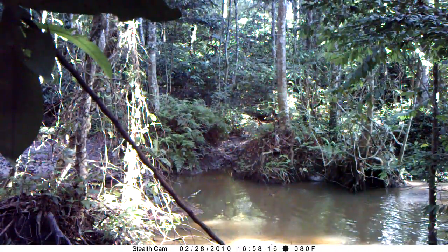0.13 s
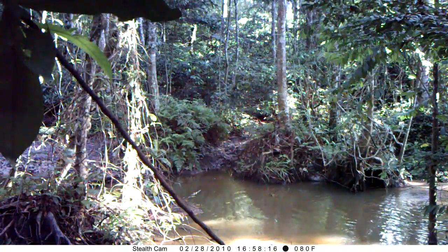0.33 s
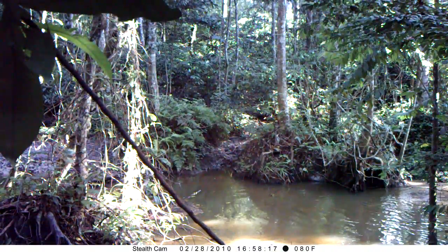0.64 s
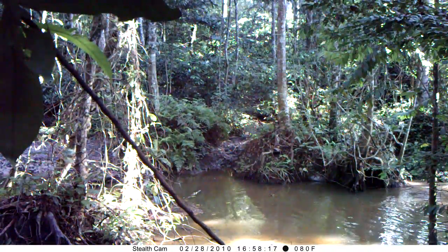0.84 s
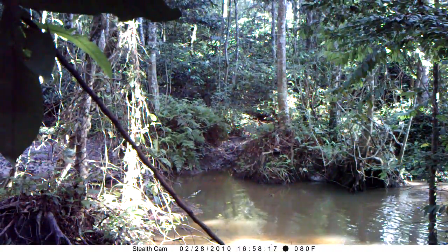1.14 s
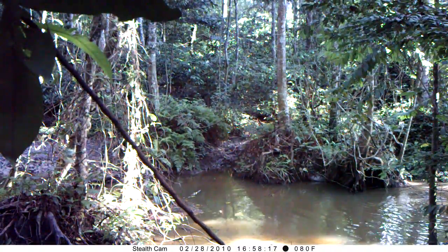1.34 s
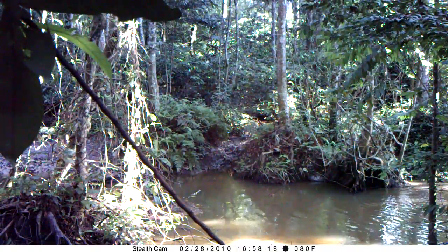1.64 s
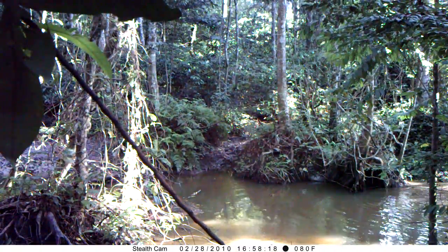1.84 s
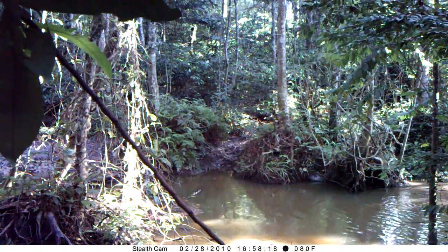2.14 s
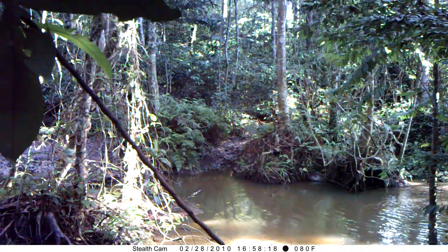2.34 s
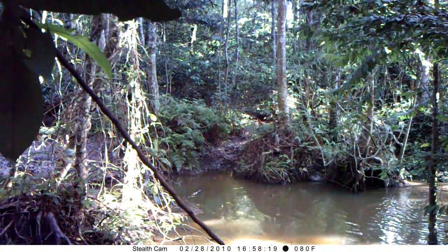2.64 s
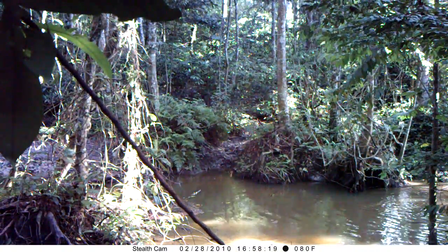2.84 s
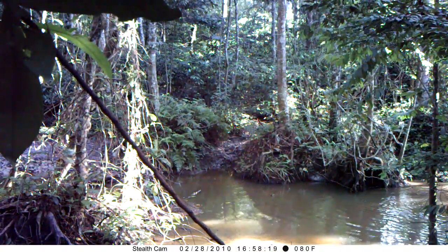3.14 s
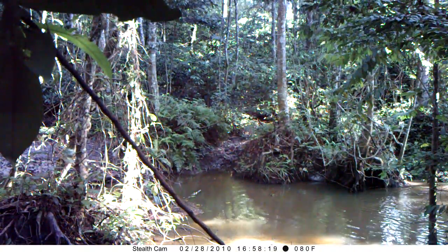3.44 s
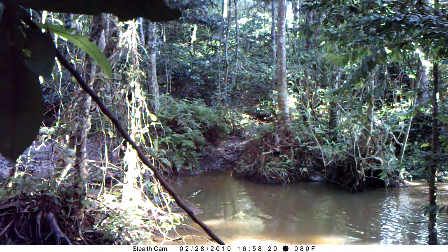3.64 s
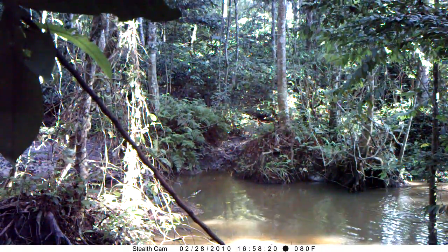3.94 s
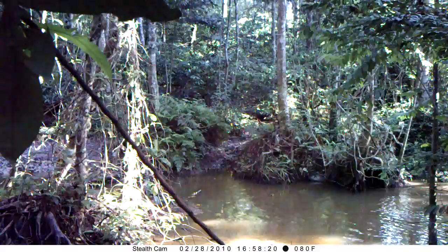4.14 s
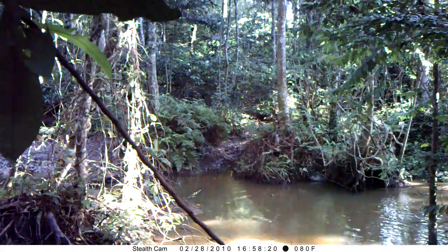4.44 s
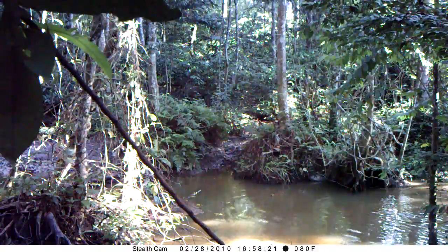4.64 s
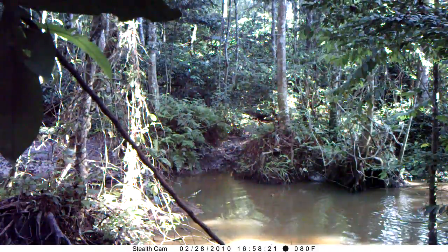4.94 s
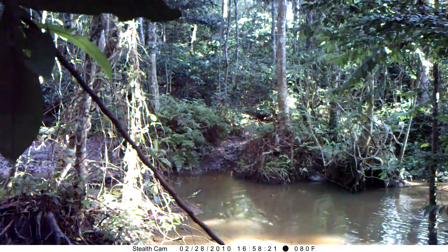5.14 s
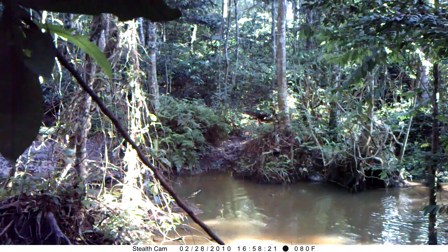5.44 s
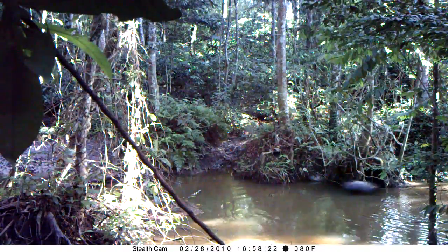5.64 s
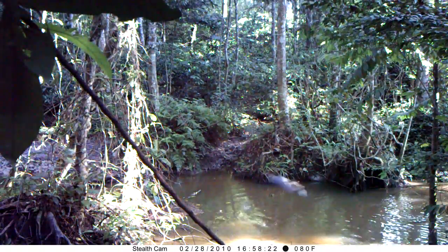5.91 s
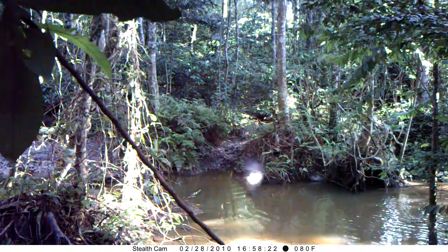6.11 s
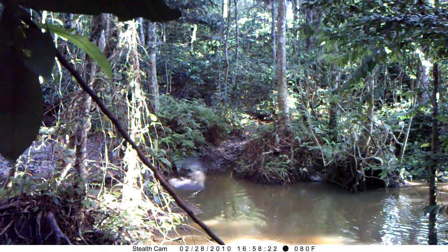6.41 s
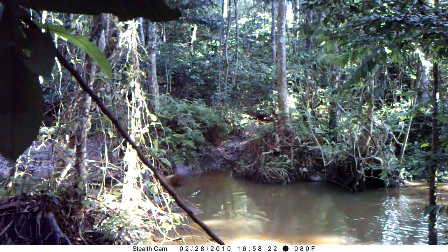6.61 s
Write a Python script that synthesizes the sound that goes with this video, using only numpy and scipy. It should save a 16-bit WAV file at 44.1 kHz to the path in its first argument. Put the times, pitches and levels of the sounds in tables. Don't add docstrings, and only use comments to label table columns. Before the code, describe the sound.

Harsh, throaty bird cries dominate: six separate nasal honks, rasping and breathy, wavering in pitch before dropping off, and growing stronger toward the final one. Each leaves a woodland echo of about a second. Before them come dry twig clicks and a slight rustle; beneath lies low steady hiss with sparse pulsing crickets and very faint insect whistles. The cheap mono microphone is band-limited, slightly gritty, and clips on the last cry.

```python
import sys
import numpy as np
from scipy import signal
from scipy.io import wavfile
from scipy.ndimage import uniform_filter1d, minimum_filter1d

SR = 44100
rng = np.random.default_rng(int(sys.argv[2]) if len(sys.argv) > 2 else 0)


def field_ratio(decibels):
    return 10 ** (np.asarray(decibels, dtype=float) / 20)


def materialize(psi):
    bounded = np.clip(np.atleast_2d(psi).T, -1, 1)
    quanta = np.round(bounded * 32767).astype(np.int16)
    wavfile.write(sys.argv[1], SR, quanta)


N = 298557


def evened(x):
    return x / np.sqrt(np.mean(x ** 2) + 1e-20)


def read(points, hz):
    f, value = np.transpose(points)
    return np.interp(np.log(hz + 1), np.log(f + 1), value)


def unroll(t, rows):
    return np.interp(t, *np.transpose(rows))


def wander(shape, seconds):
    size = max(int(seconds * SR), 1)
    return evened(uniform_filter1d(uniform_filter1d(rng.standard_normal(shape), size), size))


def add(mix, s, sound):
    part = mix[round(s * SR):][:len(sound)]
    part += sound[:len(part)]


# f/Hz, density/dB
HISS_SPECTRUM = [(15, -45), (25, -17.5), (665, -7), (979, -11), (1520, -7), (1730, -20), (2130, -7.5),
                 (2550, -13.5), (2900, -4), (3380, -10), (5530, -10), (6460, -13.5), (12000, -9),
                 (15600, -42), (22000, -120)]


def hiss():
    level_db, lift_db, rustle_db, rustle_end_s, rustle_fade_s = -56, 8, 5.5, .4, 1
    frames, hz = N // 256 + 5, np.fft.rfftfreq(1024, 1 / SR)[:, None]
    real, imag, patches = rng.standard_normal((frames, 513, 3)).T
    patches = evened(uniform_filter1d(uniform_filter1d(patches, 10, 0), 12, 1))
    colour = field_ratio(read(HISS_SPECTRUM, hz))
    t = np.arange(frames) * 256 / SR
    swell_db = lift_db + rustle_db * np.clip(1 - (t - rustle_end_s) / rustle_fade_s, 0, 1)
    swell_db = swell_db * np.minimum(hz / 1500, 1)
    z = (real + 1j * imag) * colour / np.linalg.norm(colour) * field_ratio(1.9 * patches + swell_db)
    return field_ratio(level_db) * signal.istft(z, nperseg=1024, noverlap=768)[1][:N]


# f/Hz, t60/s
FOREST_T60 = [(400, 0.12), (1400, 0.89), (2500, 0.86), (4500, 0.7), (7000, 0.65), (11000, 0.93)]
# f/Hz, level/dB
ECHO_COLOUR = [(500, -11), (1500, -8.5), (3000, -7), (5000, -3), (9000, -4)]


def forest_echo(x):
    t, out, length = np.arange(N) / SR, np.zeros(N), 3 * SR // 2
    for path in range(3):
        taps = np.zeros(length)
        at = np.arange(300, length - 20, 20)
        taps[at + rng.integers(0, 20, len(at))] = rng.choice([-1., 1.], len(at))
        hz, s, z = signal.stft(taps, SR, nperseg=256)
        near = field_ratio(-60 * s / read(FOREST_T60, hz)[:, None])
        far = field_ratio(-24.0 - 60 * s / 2.28)
        decay = (near + far) * np.minimum(s / 0.053 + 0.19, 1)
        decay /= np.sqrt((decay ** 2).mean(1, keepdims=True) * len(at))
        z = z * decay * field_ratio(read(ECHO_COLOUR, hz)[:, None])
        tail = signal.istft(z, SR, nperseg=256)[1]
        share = np.sqrt(2 / 3) * np.cos(np.pi * (5 * t + path / 3))
        out += share * signal.oaconvolve(x, tail)[:N]
    return out


# t/s, peak/dB, f/Hz
TWIGS = [
    (0.055, -23.5, 4530),
    (0.0684, -19.5, 7200),
    (0.2124, -20.5, 7660),
]


def twigs(mix):
    t = np.arange(400) / SR
    for s, db, hz in TWIGS:
        add(mix, s, field_ratio(db - 60 * t / 0.0018) * np.sin(2 * np.pi * hz * t))


def chirp(start, db, hz, throb_hz, depth, waver):
    t = start + np.arange(len(hz)) / SR
    throb = 1 - depth * np.cos(np.pi * throb_hz * t) ** 2
    wavering_hz = hz * (1 + waver * wander(len(t), 0.0045))
    tone = np.sin(2 * np.pi * np.cumsum(wavering_hz) / SR)
    return start, field_ratio(db) * evened(tone * throb) * signal.windows.tukey(len(t), .15)


# t/s, length/s, peak/dB, f/Hz
CRICKETS = [
    (0.123, 0.2, -50.5, 2950),
    (2.26, 0.14, -49, 2945),
    (4.234, 0.084, -49, 2940),
    (5.563, 0.14, -52.5, 2950),
    (5.861, 0.15, -49, 2970),
]


def crickets(mix):
    for start, length, peak_db, hz in CRICKETS:
        u = np.linspace(0, 1, round(length * SR))
        db = peak_db - 16 * np.clip(1 - u / 0.22, 0, 1) - 9 * np.clip(u - .3, 0, 1)
        add(mix, *chirp(start, db, hz + 0 * u, throb_hz=68.0, depth=0.63, waver=0.012))


# t/s, length/s, peak/dB, first f/Hz
WHISTLES = [
    (2.28, .16, -63, 5550),
    (5.42, .13, -63, 5620),
    (5.66, .31, -60, 5350),
]


def whistles(mix):
    top_hz = 5710
    for start, length, peak_db, first_hz in WHISTLES:
        u = np.linspace(0, 1, round(length * SR))
        hz = first_hz + (top_hz - first_hz) * np.sin(np.pi / 2 * np.minimum(u / 0.41, 1)) ** 2
        db = peak_db - 14 * (u - .7) ** 2
        add(mix, *chirp(start, db, hz, throb_hz=30, depth=0.33, waver=0.003))


# t/s, depth/dB, half width/s
THINNINGS = [(.31, 6, 0.018), (.55, 6, 0.026), (.68, 11, 0.019), (1.313, 8.5, 0.023), (1.421, 9.5, 0.093),
             (2.548, 13.5, 0.022), (2.646, 8.5, 0.031), (2.759, 6, 0.036), (2.848, 6, 0.01), (3.02, 1, 0.024),
             (3.599, 8, 0.1), (3.718, 21, 0.02), (3.773, 9.5, 0.024), (4.421, 6.5, 0.039), (4.49, 11, 0.033),
             (4.729, 11.5, 0.042), (6.138, 6, 0.051), (6.3, 5.5, 0.12), (6.4, -2, 0.034),
             (4.899, -2.5, 0.078), (1.78, -1, 0.088)]


def thinning(t):
    return sum(db * np.clip(1 - abs(t - s) / width, 0, 1) for s, db, width in THINNINGS)


# start/s, end/s, half-line level/dB
DOUBLING = [(.36, .47, -14), (1.3, 1.44, -15), (1.5, 1.7, -3), (1.72, 1.88, -10), (2.6, 2.72, -12),
            (2.92, 3.03, -14), (3.55, 3.66, -14), (4.4, 4.55, -14), (4.62, 4.7, -12), (6.07, 6.14, -11),
            (6.27, 6.46, -2)]


def half_lines(t):
    half = sum(field_ratio(db) * np.clip(np.minimum(t - a, b - t) / 0.013, 0, 1) for a, b, db in DOUBLING)
    return half + field_ratio(-19.5 + 5 * wander(len(t), .03))


# f/Hz, level/dB
THROAT = [(640, -42.5), (780, -40), (1020, -6.5), (1250, -6.5), (1480, 8.5), (1780, -3), (2080, 2.5),
          (2330, -1), (2620, 1.5), (3400, -3.5), (4500, -3), (6000, -6), (8000, -15), (12000, -28.5)]


def throat_db(hz, beak, nasal_db, bright_db):
    nasal = np.clip((hz - 1850) / 400 + .5, 0, 1)
    bright = np.clip((hz - 3276) / 400 + .5, 0, 1)
    return read(THROAT, hz / np.clip(beak, 7 / 8, 9 / 8)) + nasal_db * nasal + (bright_db - nasal_db) * bright


def partials(t, hz, turns, half, strain, shape):
    k = np.arange(3, 48)[:, None] / 2
    coarse = slice(None, None, 64)
    line_hz = k * hz[coarse]
    shimmer_db = (2.5 + .12 * k) * wander((len(k), len(t[coarse])), .014 / 64)
    slip = .0035 * k ** 1.4 * strain[coarse] * wander(shimmer_db.shape, .006 / 64)
    gains = field_ratio(throat_db(line_hz, *(c[coarse] for c in shape))) * np.where(k % 1, half[coarse], 1)
    low_rms = np.sqrt((gains ** 2 * (line_hz < 1800)).sum(0) / 2)
    gains *= field_ratio(shimmer_db) / low_rms
    swings = gains * np.exp(2j * np.pi * (rng.random(k.shape) + slip))
    half_turn = np.exp(1j * np.pi * turns)
    voice, partial = np.zeros(len(t)), half_turn ** 2
    for swing in swings:
        partial = partial * half_turn
        voice += (np.interp(t, t[coarse], swing) * partial).real
    return voice


def chest_tone(hz, turns, half, level_db):
    db = level_db + 8.5 + 0.0037 * (hz - 520) + 2.5 * wander(len(hz), 0.013)
    undertone = field_ratio(-4.5) * half ** 2 * np.cos(3 * np.pi * turns)
    return field_ratio(db) * (np.cos(2 * np.pi * turns) + undertone)


def pulsed_breath(t, turns, shape):
    puffs = (0.93 + np.exp(-(turns % 1) / 0.064)) * rng.standard_normal(len(t))
    f, s, z = signal.stft(evened(puffs), SR, nperseg=256)
    f = f[:, None]
    tint = field_ratio(throat_db(f, *(np.interp(s + t[0], t, c) for c in shape)))
    tint /= np.sqrt((tint ** 2 * (f < 1800)).mean(0))
    return signal.istft(z * tint, SR, nperseg=256)[1][:len(t)]


def cry(row, pitch, effort):
    bright_db, chest_db, nasal_db, resonance_scale, hoarseness = row
    t = np.arange(pitch[0][0], pitch[-1][0], 1 / SR)
    hz = uniform_filter1d(unroll(t, pitch), size=300)
    thinning_db = thinning(t)
    muffle_db = 24.5 * np.exp(-(t - t[0]) / 0.017)
    effort_db = unroll(t, effort) - thinning_db
    bright_db = bright_db + thinning_db - muffle_db
    chest_db = chest_db + 1.1 * thinning_db
    nasal_db = nasal_db + 1.1 * thinning_db - 0.71 * muffle_db
    beak = resonance_scale + 0.52 * (hz / 520 - 1)
    shape = beak, nasal_db, bright_db
    glide_hz_per_s = abs(np.gradient(uniform_filter1d(hz, size=600))) * SR
    strain = hoarseness + np.minimum(glide_hz_per_s / 1800, 2.0)
    turns = np.cumsum(hz * (1 + .003 * strain * wander(len(t), .004))) / SR
    half = half_lines(t)
    voice = partials(t, hz, turns, half, strain, shape)
    chest = chest_tone(hz, turns, half, chest_db)
    breath = field_ratio(-20) * strain ** 1.3 * pulsed_breath(t, turns, shape)
    edge = np.clip(np.minimum((t - t[0]) / 0.0012, (t[-1] - t) / 0.049), 0, 1)
    return t[0], field_ratio(effort_db) * edge * (voice + chest + breath)


# brightness/dB, chest tone/dB, nasal band/dB, throat resonance scale/1, hoarseness/1
CRIES = [
    (7, -29, 1, 0.974, 2.2),
    (5, -33.5, -1, 1.0, 1.6),
    (6.5, -31.5, 1, 1.004, 1.6),
    (9, -31.5, 1.5, 1.012, 1.6),
    (5.5, -32, 0.5, 1.0155, 1.4),
    (5, -35.5, -3, 0.973, 1.4),
]
# t/s, f/Hz
PITCH = [
    [(.232, 349.3), (.272, 506), (.33, 544.7), (.404, 485.8), (.52, 546.3), (.6, 487.5), (.7, 513.7),
     (.726, 427.5), (.76, 367.3)],
    [(1.205, 347.4), (1.29, 532.4), (1.455, 515), (1.491, 430.5), (1.521, 491.8), (1.689, 481.4),
     (1.709, 446.3), (1.87, 427.2), (1.93, 394)],
    [(2.508, 377), (2.59, 532), (2.694, 541), (2.73, 504.2), (2.88, 530), (2.92, 429.3), (3.03, 438),
     (3.088, 473), (3.16, 383)],
    [(3.455, 331.5), (3.529, 523), (3.575, 539), (3.639, 471), (3.685, 512), (3.72, 500.7), (3.769, 537.6),
     (3.831, 492.7), (3.9, 371.4)],
    [(4.322, 374.6), (4.41, 520), (4.55, 520), (4.585, 441.3), (4.64, 496.6), (4.76, 517.8), (4.815, 418.4),
     (4.995, 406.3), (5.04, 290.5)],
    [(5.985, 319.1), (6.074, 491.7), (6.124, 515.2), (6.205, 509.2), (6.222, 450.5), (6.38, 480.7),
     (6.45, 466.8), (6.484, 391), (6.515, 268)],
]
# t/s, effort/dB
EFFORT = [
    [(.232, -38.5), (.27, -36), (.41, -32.5), (.6, -34), (.73, -31), (.76, -20)],
    [(1.205, -49.5), (1.237, -32), (1.34, -28.5), (1.48, -27), (1.655, -28), (1.7, -30.5), (1.89, -30.5),
     (1.93, -22.5)],
    [(2.508, -47), (2.53, -26), (2.7, -27.5), (2.83, -30), (3.07, -29), (3.16, -24.5)],
    [(3.455, -44), (3.48, -35.5), (3.53, -26), (3.64, -26.5), (3.75, -26), (3.87, -28), (3.9, -30)],
    [(4.322, -39.5), (4.36, -28), (4.47, -23), (4.68, -24), (4.78, -21), (4.83, -29), (5.0, -29.5),
     (5.04, -29.5)],
    [(5.985, -34.5), (6.028, -22), (6.17, -13.5), (6.29, -23), (6.37, -17.5), (6.44, -22), (6.515, -34.5)],
]


def bird(mix):
    for row, pitch, effort in zip(CRIES, PITCH, EFFORT):
        add(mix, *cry(row, pitch, effort))


def scene():
    direct = np.zeros(N)
    twigs(direct)
    crickets(direct)
    whistles(direct)
    bird(direct)
    mono = direct + forest_echo(direct) + hiss()
    return np.array([mono, mono])


# f/Hz, width/Hz, level/dB
PORT_DIPS = [(2350, 100, -6), (3694, 393, -6), (7930, 1000, -1)]
# f/Hz, level/dB
THRIFT = [(400, -80), (900, -24), (1500, -10), (2500, -4), (3400, -3.8), (5000, -8), (7500, -1.5),
          (11500, -1.5)]


def camera_bands(x, size=1024):
    edge_hz = 11900
    n, k = np.arange(2 * size)[:, None], np.arange(300 * size // 512)
    window = np.sin(np.pi * (n + .5) / (2 * size))
    basis = window * np.cos(np.pi / size * (n + .5 + size / 2) * (k + .5)) * np.sqrt(2 / size)
    padded = np.pad(x, (size, 2 * size - len(x) % size))
    c = np.lib.stride_tricks.sliding_window_view(padded, 2 * size)[::size].copy() @ basis
    hz = (k + .5) * SR / 2 / size
    port_db = sum(db * np.exp(-((hz - f) / w) ** 2) for f, w, db in PORT_DIPS)
    c *= field_ratio(port_db) * (hz < edge_hz)
    power = uniform_filter1d(c ** 2, size=2, axis=0)
    band = np.repeat(power.reshape(len(c), -1, 8).mean(2), 8, axis=1)
    mask = abs(uniform_filter1d(power, size=40, axis=1)) * field_ratio(read(THRIFT, hz)) ** 2 + 1e-14
    step = .8 * np.sqrt(mask)
    frames = (np.round(c / step) * step * (band > mask)) @ basis.T
    return (frames[1:, :size] + frames[:-1, size:]).ravel()[:len(x)]


# t/s, level/dB
OVERLOADS = [(2.517, -44), (3.7948, -39), (4.757, -34), (6.1, -33), (6.105, -25), (6.1487, -35),
             (6.1506, -58), (6.1568, -54), (6.1845, -31), (6.3565, -50), (6.361, -35), (6.3632, -30),
             (6.3649, -30), (6.3705, -40), (6.374, -46), (6.381, -49), (6.3837, -34), (6.3918, -34),
             (6.3944, -49), (6.3986, -34), (6.407, -41), (6.409, -47), (6.419, -43), (6.4256, -37),
             (6.4284, -25), (6.437, -47)]


def shave_peaks(mono):
    shaving = np.exp(-(np.arange(-8, 9) / .9) ** 2)
    for s, db in OVERLOADS:
        sign = np.sign(mono[round(s * SR) + len(shaving) // 2])
        add(mono, s, -sign * field_ratio(db + 17.0) * shaving)


def low_pass(x):
    return signal.sosfilt(signal.butter(12, 15850, fs=SR, output="sos"), x)


def record(dry):
    ceiling = .72
    room = minimum_filter1d(np.minimum(ceiling / (abs(dry[0]) + 1e-9), 1), size=90)
    mono = camera_bands(dry[0] * uniform_filter1d(room, size=80))
    shave_peaks(mono)
    return low_pass(np.array([mono, mono]))


dry = scene()
out = record(dry)
materialize(out)
```